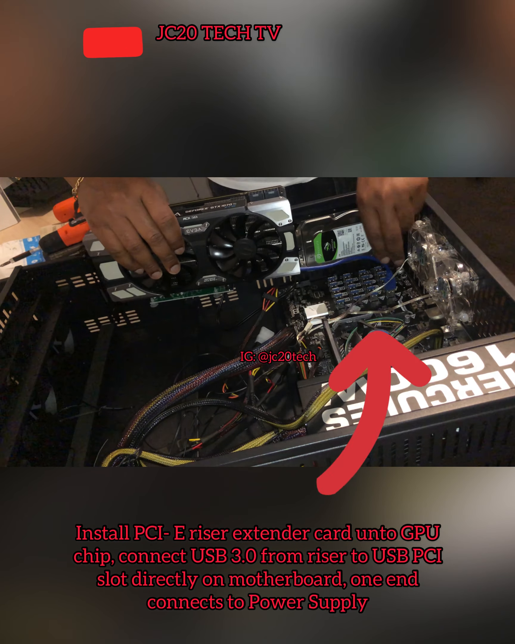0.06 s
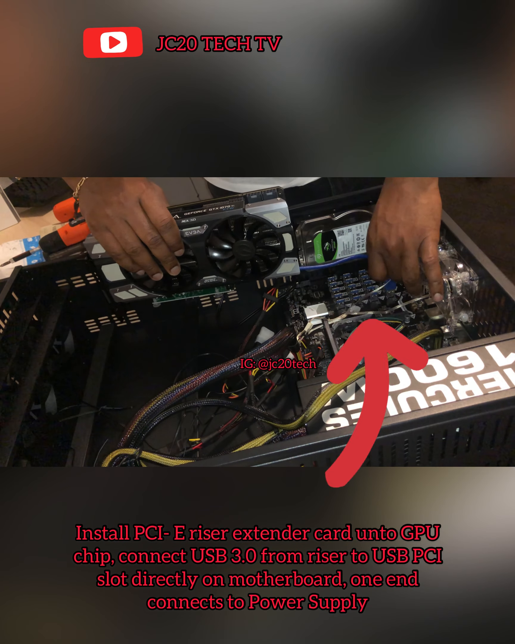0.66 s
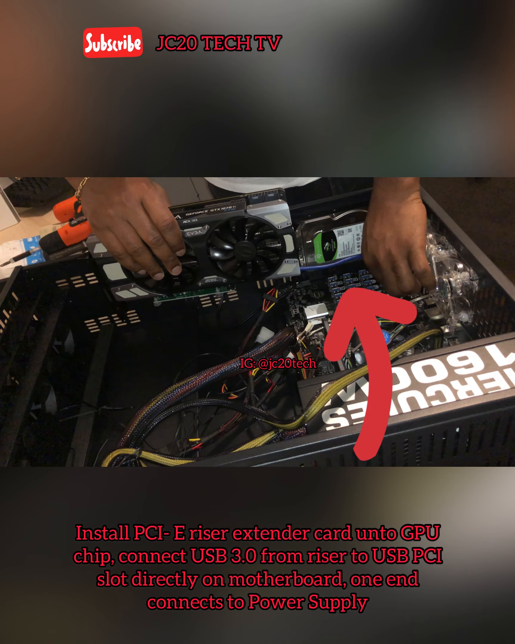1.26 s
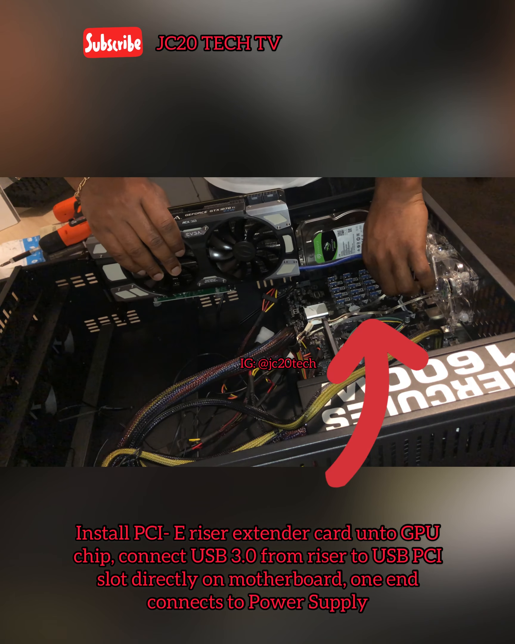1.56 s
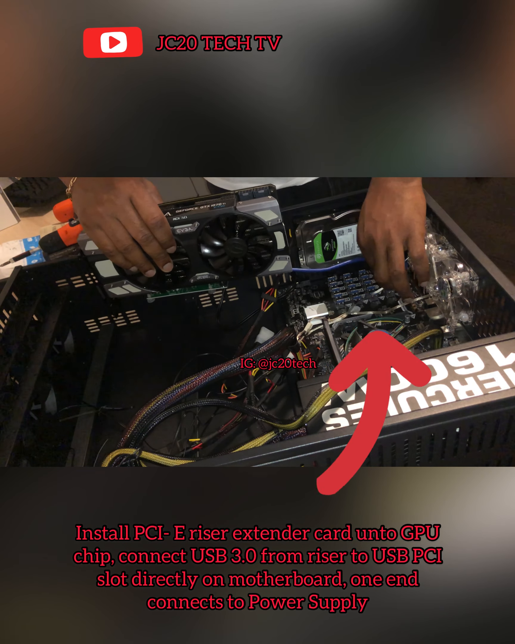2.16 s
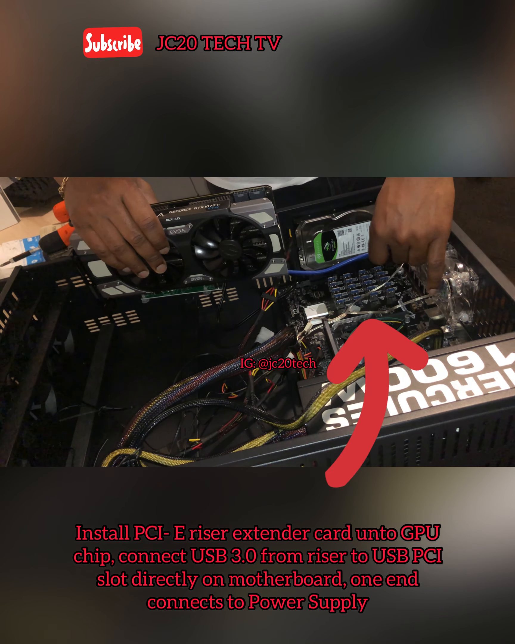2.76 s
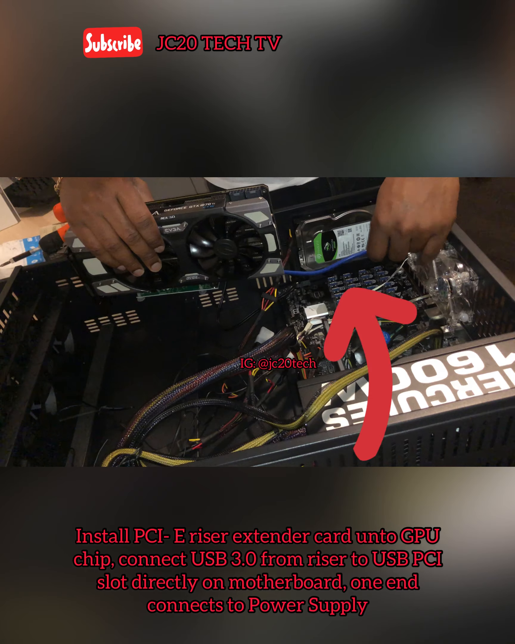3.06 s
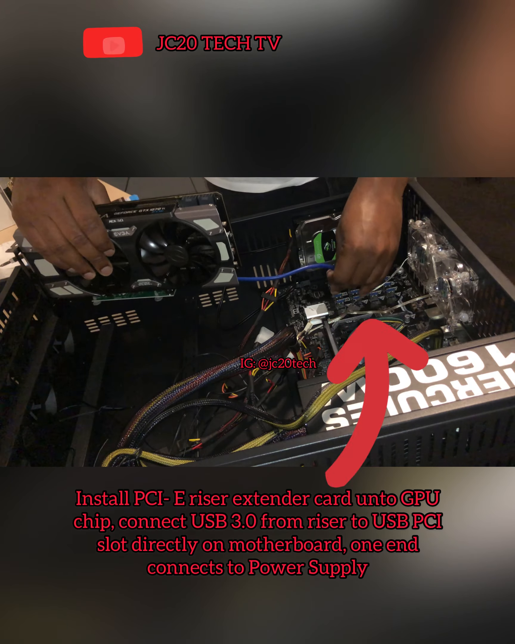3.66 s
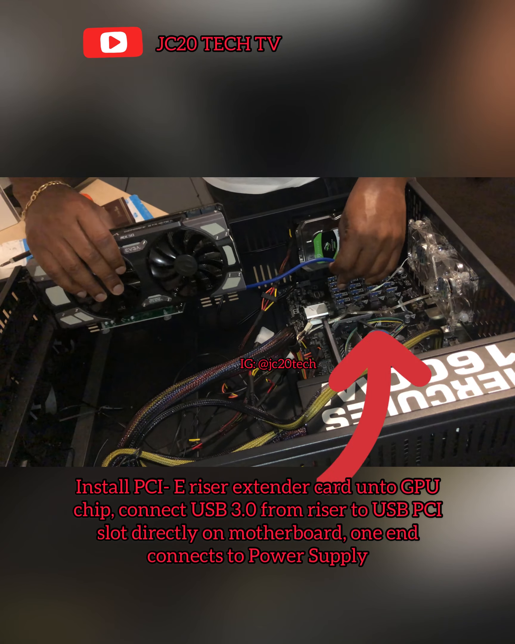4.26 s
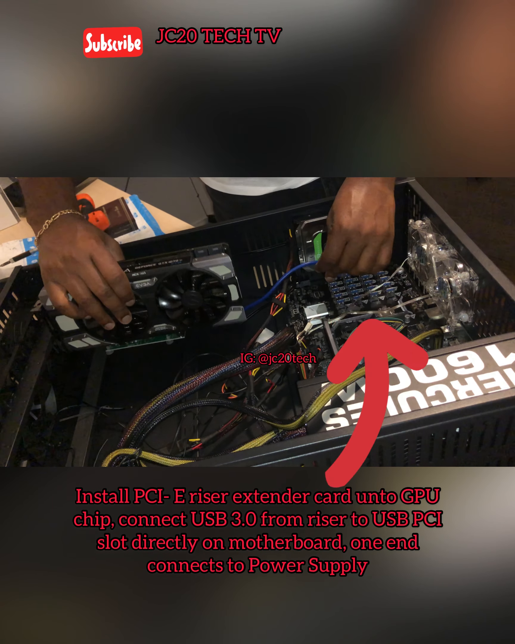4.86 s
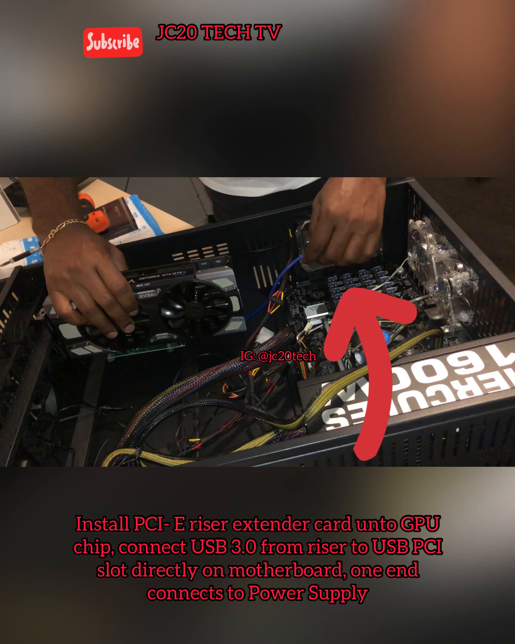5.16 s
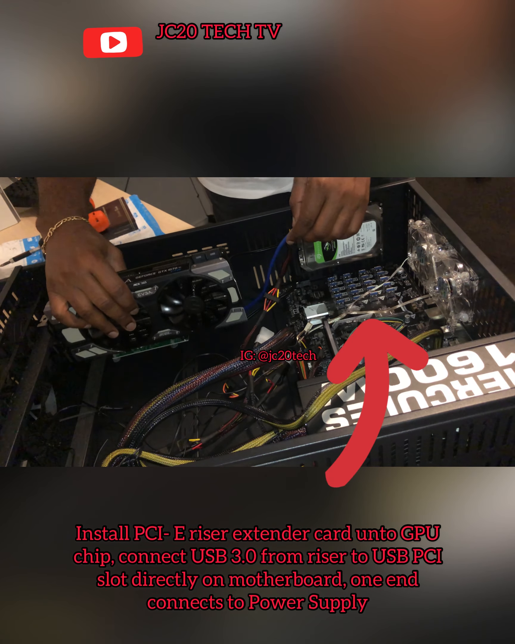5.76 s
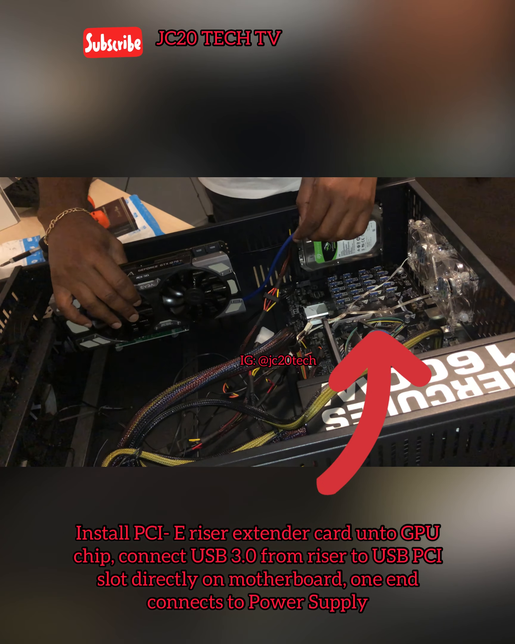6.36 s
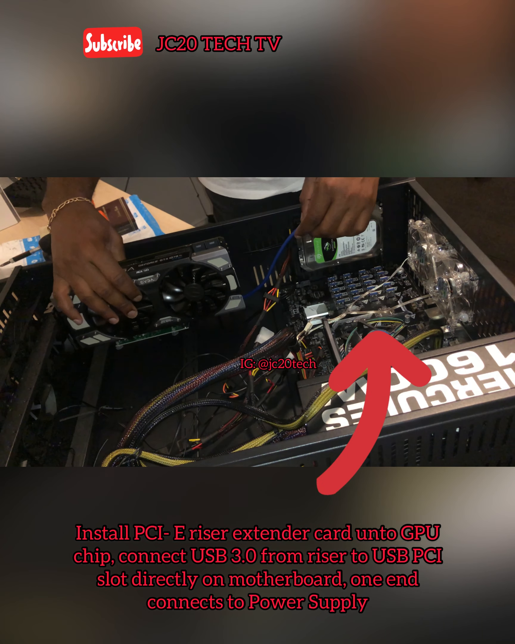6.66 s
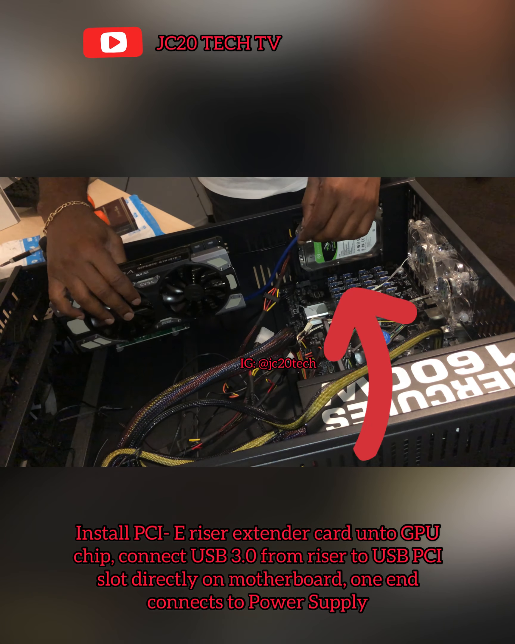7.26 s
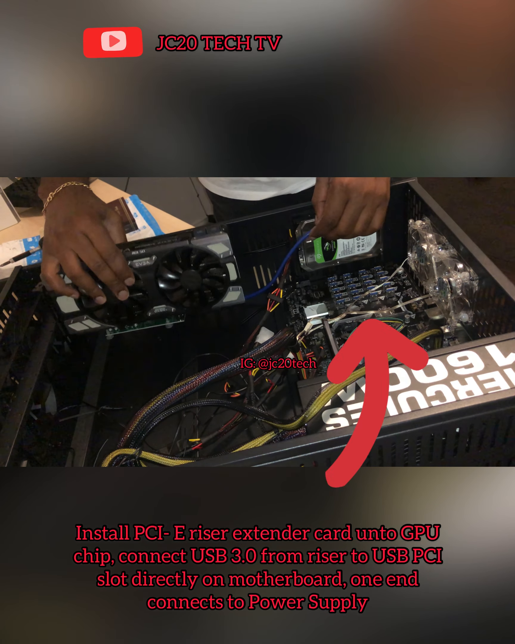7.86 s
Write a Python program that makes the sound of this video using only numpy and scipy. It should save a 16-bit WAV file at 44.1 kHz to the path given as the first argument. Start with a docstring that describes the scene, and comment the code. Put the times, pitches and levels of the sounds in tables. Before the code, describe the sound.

A loud snap, a latching plug, then a graphics card clanking into a steel computer case as cables tick and drag.

```python
"""Light knocks and plastic rustle come first, then the loud snap of a riser board onto a graphics card.
A plug latches with a double click, and the card is set down in an open steel case: its bracket clinks,
the panels boom, cables tick and drag along the frame, and plastic squeaks under a finger.
Heard close by on one microphone, in a small room that answers the contacts, over a faint fan hum."""
import sys
import numpy as np
from scipy import signal
from scipy.fft import rfft, irfft, next_fast_len
from scipy.io import wavfile
from scipy.ndimage import uniform_filter1d, map_coordinates

SR = 44100
rng = np.random.default_rng(int(sys.argv[2]) if len(sys.argv) > 2 else 0)


def store_pcm(level_fs):
    """Save levels as 16-bit WAV."""
    pcm = np.round(np.clip(level_fs, -1, 1) * 32767).astype(np.int16)
    wavfile.write(sys.argv[1], SR, np.atleast_2d(pcm).T)


N = 348390
AGE = np.arange(int(1.5 * SR)) / SR  # seconds since a contact

# contacts of the snap: t/s, level/dB, t60/s, jolt to the frame/dB
SNAP_CONTACTS = [(1.7202, -39, 0.032, -63.5), (1.7226, -30, .02, -64.5), (1.7244, -17, 0.019, -29.5),
                 (1.7264, -19.5, 0.021, -56), (1.7286, -23, 0.031, -54.5), (1.7544, -34, .035, -44.5)]
# spectrum of the slot: f/Hz, relative level/dB
SLOT_SPECTRUM = [(88, -42), (150, -8.5), (239, -12), (390, -14), (564, -5), (660, -10), (1520, -7.5),
                 (1650, -15.5), (1780, -11), (2040, -13.5), (3020, -13.5), (3260, -16.5), (3810, -13),
                 (9160, -19), (15800, -30)]
# modes of the board and of the loaded frame: f/Hz, relative level/dB, t60/s
BOARD_MODES = [(1063, -3.5, 0.081), (1170, -2.5, 0.087), (1350, -17, 0.21), (1550, -12.5, 0.19),
               (1730, 1.5, .075), (2233, -5.5, 0.033), (2344, -1.5, 0.056), (3830, -7, 0.048),
               (4960, -2, 0.033), (9050, -12, .025)]
FRAME_MODES = [(70.26, -13, 0.43), (163, -2.5, 0.33), (212.8, 4, 0.26), (263.7, 3.5, 0.26), (325, -6, 0.43),
               (478, -10.5, .4), (578, -6, 0.27), (785, -7.5, 0.27), (950, -9, .25)]

def riser(board_db=-5, thud_db=-2, boom_db=-8):
    """The card edge bottoms out in the slot and jolts the frame: the loudest sound at the microphone."""
    out = np.zeros(N)
    for s, db, t60, jolt_db in SNAP_CONTACTS:
        snap = colour(burst(t60), SLOT_SPECTRUM, peak_hz=1700, peak_db=2, tilt_db=0.2, octaves=0.6)
        add(out, s, amp(db) * in_room(snap, wet_db=-3.5))
        add(out, s, amp(jolt_db + boom_db) * boom())
    # the hardest blow sets the board and the frame ringing
    s, db, _, jolt_db = max(SNAP_CONTACTS, key=lambda row: row[1])
    add(out, s, amp(db + board_db) * in_room(ring(BOARD_MODES, rough=0.99), wet_db=-13.5))
    add(out, s, amp(jolt_db + thud_db) * ring(FRAME_MODES, attack=0.008))
    return out


# pushes into the socket: t/s, length/s, level/dB
PLUG_PUSHES = [(2.28, 0.093, -62.5), (2.39, .05, -54.5), (2.47, 0.089, -62.5)]
# clicks of the latch: t/s, level/dB, t60/s
LATCH_CLICKS = [(2.5424, -36.5, 0.025), (2.5445, -34.5, 0.035)]
# spectrum of the plug: f/Hz, relative level/dB
PLUG_SPECTRUM = [(120, -39), (200, -26), (236, -23), (316, -12.5), (621, -14), (693, -7.5), (999, -6.5),
                 (1220, -5.5), (1520, -8), (2190, -11), (2490, -15), (4160, -15), (4640, -18.5),
                 (5680, -15.5), (15800, -38.5)]
# modes of its shell: f/Hz, relative level/dB, t60/s
SHELL_MODES = [(679, -15, 0.33), (1196, -6, 0.22), (1321, -8, 0.22), (1400, -7, 0.28), (5520, -2.5, 0.03),
               (9200, -1.5, 0.029)]

def plug(shell_db=-7):
    """A plug scrapes into its socket and latches with a double click that rings its shell."""
    out = strokes(PLUG_PUSHES) * friction(PLUG_SPECTRUM, grain_db=1.9, grain_hz=150, tilt_db=-4.5)
    for s, db, t60 in LATCH_CLICKS:
        click = colour(burst(t60), PLUG_SPECTRUM, tilt_db=0.5)
        add(out, s, amp(db) * in_room(click, wet_db=-2))
        add(out, s, amp(db + shell_db) * in_room(ring(SHELL_MODES, rough=0.88), wet_db=-10.5))
    return out


# card against case: t/s, level/dB, resonance f/Hz, resonance/dB, tilt/(dB per octave), boom/dB
CARD_KNOCKS = [(.057, -53, 870, 8, 1.5, -78), (.868, -53, 1900, 5, -0.5, -80),
               (2.0063, -40, 4430, 5, 1, -55), (3.9737, -39.5, 3720, 7.5, 4, -57.5),
               (4.648, -38.5, 1840, 7, 1.5, -46.5), (4.6497, -39.5, 3650, 5, -0.5, -75),
               (4.672, -41, 1190, 14, -8, -51.5), (5.0155, -45.5, 1930, 13, 3.5, -85),
               (5.0628, -41.5, 6750, -3, 4.5, -51.5), (5.068, -39.5, 1530, 12.5, 0.5, -54),
               (5.091, -46.5, 833, 18, 2, -59), (5.418, -45.5, 3580, 3, 3, -50),
               (5.426, -49.5, 820, 10, -6, -59), (5.457, -44.5, 4250, 4, 5.5, -75),
               (5.74, -58, 2050, 10, 4, -72), (6.028, -50.5, 1500, 2, -3, -81),
               (6.207, -40, 5060, 7.5, 2.5, -56), (6.535, -58, 710, 11, -2, -57)]
# spectrum of the card: f/Hz, relative level/dB
CARD_SPECTRUM = [(150, -31), (250, -8.5), (443, -8), (1190, -4.5), (1350, -7.5), (1600, -6.5), (2650, -9.5),
                 (3490, -11.5), (4380, -13), (8030, -21), (15800, -44)]

def knocks(t60_at_1khz=0.062, damping=0.56):
    """Each knock cracks at its own resonance, the higher the shorter; the steel booms a moment later."""
    out = np.zeros(N)
    for s, db, hz, peak_db, tilt_db, boom_db in CARD_KNOCKS:
        t60 = t60_at_1khz / (hz / 1000) ** damping
        crack = colour(burst(t60), CARD_SPECTRUM, hz, peak_db, tilt_db)
        add(out, s, amp(db) * in_room(crack, wet_db=-2))
        add(out, s, amp(boom_db) * boom())
    return out


# spectrum of the case panels: f/Hz, relative level/dB
BOOM_SPECTRUM = [(30, -27), (55, -30), (70, -0.5), (100, -1.5), (160, 3), (220, 2), (320, -5), (500, -7),
                 (900, -28), (2500, -62)]

def boom(t60=0.44, swell_s=0.012):
    """The sheet steel of the case starts slowly and drums on."""
    shake = burst(t60, attack=swell_s)
    onset = 1 - np.exp(-2 * AGE[:len(shake)] / swell_s)
    return colour(shake * onset, BOOM_SPECTRUM)


# metal meeting metal in the case: t/s, bracket/dB, tab/dB, cooler/dB, rail/dB, floor panel/dB
METAL_CONTACTS = [(3.975, -52, -81, -76, -59, -60), (4.649, -61, -68, -45.5, -61.5, -39),
                  (5.016, -63.5, -55.5, -69, -73.5, -75), (5.458, -64.5, -52, -72, -73, -72)]
# modes of those five parts: f/Hz, relative level/dB, t60/s
BRACKET_MODES = [(1444, -11, 0.36), (1600, -12, 0.47), (2170, -5, 0.52), (2390, -2.5, 0.27),
                 (3420, -18, 0.48), (3690, 3.5, 0.12), (3795, 1, 0.1), (4420, -11, 0.19),
                 (5100, -2.5, 0.063), (5450, -12.5, 1), (5890, -3, 0.12), (6110, -10, 0.36),
                 (6460, -5, .28), (7270, -9, 0.48), (7530, -11, .33), (9100, -6.5, .18), (11530, -12, .2),
                 (12100, -15, .2)]
TAB_MODES = [(2050, -8, .4), (3520, -5, 0.059), (3780, -10, .2), (4570, -15, 0.26), (4900, -12, .25),
             (5000, -14, 0.32), (6620, -9, 0.16), (7574, -11, .35), (8260, 0, 0.19), (8450, -11, 0.082),
             (15200, -18, .07)]
COOLER_MODES = [(580, -13, .6), (1133, -8, 0.34), (1206, -6, .4), (1643, -2, 0.097), (1752, -4, 0.17),
                (1850, -5.5, 0.17), (2026, -8, .3), (2430, -11.5, 0.32), (2760, -11, .35), (3370, -18, .2),
                (3646, -0.5, 0.063), (5460, -16.5, 1.3)]
RAIL_MODES = [(290, 0, 2.07), (598, -5, 0.76), (727, 2, 1.8), (2180, -6.5, 1.0)]
PANEL_MODES = [(68.7, -9, 0.51), (103, -1.5, 0.44), (146, 1.5, 1), (217, -16, 0.65)]

def clinks(strike_db=8, strike_t60=0.032):
    """Bracket, tab and cooler flare, are damped by the hand and ring on; rail and panel swell slowly."""
    out = np.zeros(N)
    flare = 1 + amp(strike_db) * fade(strike_t60)
    for s, bracket_db, tab_db, cooler_db, rail_db, panel_db in METAL_CONTACTS:
        bracket = amp(bracket_db) * ring(BRACKET_MODES, rough=1.35)
        tab = amp(tab_db) * ring(TAB_MODES, rough=1.9)
        cooler = amp(cooler_db) * ring(COOLER_MODES, rough=0.94)
        add(out, s, in_room(flare * (bracket + tab + cooler), wet_db=-10))
        add(out, s, amp(rail_db) * ring(RAIL_MODES, attack=0.022))
        add(out, s, amp(panel_db) * ring(PANEL_MODES, attack=0.041))
    return out


# cables and fingers sliding: t/s, length/s, level/dB
SLIDE_STROKES = [(.35, .13, -68.5), (0.637, 0.23, -68), (0.982, .06, -69.5), (1.438, 0.037, -69),
                 (1.916, 0.086, -60.5), (2.275, 0.065, -64.5), (2.368, .05, -67), (2.95, 0.064, -72.5),
                 (4.848, 0.26, -71.5), (6.138, 0.11, -73), (6.404, 0.26, -69.5), (6.989, 0.057, -69.5),
                 (7.232, .09, -73), (7.46, 0.037, -77)]
# a cable dragging on the case: t/s, length/s, level/dB before drag_db
CABLE_DRAGS = [(6.8, .58, -57.5)]
# the cable slipping: t/s, level/dB, resonance f/Hz
CABLE_SLIPS = [(6.772, -51.5, 245), (6.812, -50, 246), (6.864, -48, 413), (6.878, -45, 238),
               (6.9, -55, 450), (7.02, -57, 440), (7.112, -51.5, 350), (7.162, -45, 433), (7.27, -51, 427),
               (7.284, -48, 433), (7.381, -54, 400)]
# spectra of the sliding hiss and of the hollow case: f/Hz, relative level/dB
HISS_SPECTRUM = [(400, -33), (1500, -1), (2800, -5.5), (4200, -2.5), (6000, -3), (9000, -9.5), (15000, -22)]
HOLLOW_SPECTRUM = [(90, -28), (170, -10.5), (240, 0), (290, -4), (370, -6), (435, 2), (520, -8),
                   (650, -9.5), (900, -18.5), (2500, -42)]

def cables(drag_db=-5):
    """Sliding gives a grainy hiss; stick and slip drum on the hollow case."""
    hiss = strokes(SLIDE_STROKES) * friction(HISS_SPECTRUM, grain_db=2.5, grain_hz=400)
    drum = amp(drag_db) * strokes(CABLE_DRAGS) * friction(HOLLOW_SPECTRUM, grain_db=1.9, grain_hz=45)
    for s, db, hz in CABLE_SLIPS:
        slip = colour(burst(t60=0.078, attack=0.0012), HOLLOW_SPECTRUM, hz, peak_db=10.5)
        add(drum, s, amp(db) * slip)
    return hiss + drum


# small plastic taps: t/s, level/dB, resonance f/Hz, resonance/dB
PLASTIC_TAPS = [(0.72, -49, 4600, 11), (0.98, -50, 4800, 4), (1.9912, -45.5, 4050, 7.5),
                (2.197, -50, 3930, 16), (4.5093, -59.5, 7500, 0), (4.941, -55, 6000, 17),
                (5.2486, -52, 7600, 16), (5.6445, -53, 7600, 16), (6.7703, -41.5, 3230, 11.5),
                (6.852, -53.5, 3400, -9), (7.0587, -46, 5600, 20), (7.061, -46, 9400, 20),
                (7.376, -45.5, 7800, 17)]

def ticks(strays_per_s=9, stray_over_hiss_db=9, stray_hz=5000):
    """Connectors and cable sheaths tap the parts, and tick faintly at random while they slide."""
    out = np.zeros(N)
    for s, db, hz, peak_db in PLASTIC_TAPS:
        add(out, s, amp(db) * tick(hz, peak_db))
    for start, length, db in SLIDE_STROKES:
        for when, pitch in rng.random((round(strays_per_s * length), 2)):
            hz = stray_hz * 2 ** (pitch - 0.5)  # within half an octave either way
            add(out, start + when * length, amp(db + stray_over_hiss_db) * tick(hz, peak_db=7))
    return out


# spectrum of the plastic parts: f/Hz, relative level/dB
PLASTIC_SPECTRUM = [(300, -24.5), (1200, 1.5), (4000, 4), (9000, 0), (15500, -14)]

def tick(hz, peak_db):
    """One light tap of plastic, heard with the room."""
    tap = colour(burst(t60=0.017), PLASTIC_SPECTRUM, hz, peak_db, octaves=0.26)
    return in_room(tap, wet_db=-6)


# plastic squeaking under a finger: t/s, level/dB, f/Hz
FINGER_SQUEAKS = [(0.689, -61, 4300), (1.468, -60, 4350), (2.8385, -61.5, 5260), (3.885, -63, 4970),
                  (6.125, -67, 4700), (6.185, -63, 4750)]

def squeaks():
    """A fingertip catches on plastic and excites one narrow resonance."""
    out = np.zeros(N)
    for s, db, hz in FINGER_SQUEAKS:
        catch = burst(t60=0.077, attack=0.003)
        squeak = colour(catch, PLASTIC_SPECTRUM, hz, peak_db=17.5, octaves=0.053)
        add(out, s, amp(db) * in_room(squeak, wet_db=-6))
    return out


# spectrum of the moving air: f/Hz, relative level/dB
AIR_SPECTRUM = [(15, -76), (25, -55), (59, -12.5), (116, -16), (148, -2), (194, -8.5), (222, -11.5),
                (324, -9.5), (352, -12.5), (572, -13), (729, -12.5), (981, -17), (2520, -23.5),
                (3050, -24.5), (15800, -33.5)]
# motor tones: f/Hz, level/dB before hum_db
MOTOR_TONES = [(75.4, -77), (150.7, -75), (220.7, -80.5), (355.3, -80), (705.2, -74.5), (753.7, -83),
               (888.2, -83)]

def fan(air_db=-66, hum_db=-1, waver_rad=0.26):
    """The room tone behind the work: a fan's steady air noise and slightly unsteady motor hum."""
    t = np.arange(N) / SR
    hum = np.zeros(N)
    for hz, db in MOTOR_TONES:
        peak = np.sqrt(2) * amp(db + hum_db + 0.98 * wobble(4.08))
        hum += peak * np.sin(2 * np.pi * hz * t + waver_rad * wobble(7.8))
    air = unit(colour(rng.standard_normal(N), AIR_SPECTRUM))
    return amp(air_db) * air + hum


# reverberation of the small room: f/Hz, t60/s
ROOM_DECAY = [(100, 0.18), (500, 0.6), (1500, 0.52), (4000, 0.45), (9000, .42), (16000, 0.2)]

def in_room(x, wet_db, build_s=0.0014):
    """A sound reaches the microphone directly, followed by the room's diffuse answer from that spot."""
    hz, t, noise = signal.stft(rng.standard_normal(SR * 2 // 3), SR, nperseg=256)
    envelope = fade(along(ROOM_DECAY, hz)[:, None], t) * (1 - np.exp(-t / build_s))
    response = signal.istft(noise * envelope, SR, nperseg=256)[1]
    response *= amp(wet_db) / np.linalg.norm(response)
    response[0] += 1  # the direct path
    return signal.fftconvolve(x, response)


def burst(t60, attack=0.00019, span_hz=350):
    """The dense, quickly dying vibration of one contact, its energy spread evenly over frequency."""
    t = AGE[:SR * 3 // 4]
    spectrum = rfft(rng.standard_normal(len(t)) * fade(t60, t) * (1 - np.exp(-t / attack)))
    power = np.abs(uniform_filter1d(np.abs(spectrum) ** 2, int(span_hz * t[-1]) + 1))
    even = irfft(spectrum * np.sqrt(power.mean() / (power + 1e-12)), len(t))
    taper = np.clip(2 - 4 * t / t[-1], 0, 1)
    return even * taper


def ring(modes, attack=0.00029, scatter_db=2.5, rough=0):
    """Modes struck at slightly random strengths; loose contact roughens their phase."""
    drifts = np.cumsum(rng.standard_normal((len(modes), len(AGE))), axis=1) * rough / np.sqrt(SR)
    out = np.zeros(len(AGE))
    for (hz, db, t60), drift in zip(modes, drifts):
        strength = amp(db + scatter_db * rng.normal())
        out += strength * fade(t60) * np.sin(2 * np.pi * (hz * AGE + rng.random() + drift))
    return out * (1 - np.exp(-AGE / attack))


def friction(spectrum, grain_db, grain_hz, tilt_db=0):
    """Rubbing noise of rms 1, made grainy by a flickering level."""
    grains = rng.standard_normal(N) * amp(grain_db * wobble(grain_hz))
    return unit(colour(grains, spectrum, tilt_db=tilt_db))


def strokes(rows, attack_s=0.032, release_t60=0.45):
    """Gain per sample of rubbing strokes: each gathers speed, holds, then dies away."""
    t = np.arange(N) / SR
    gain = np.zeros(N)
    for s, length, db in rows:
        rise = np.clip((t - s) / attack_s, 0, 1)
        gain += amp(db) * rise * fade(release_t60, np.maximum(t - s - length, 0))
    return gain


def colour(x, spectrum, peak_hz=1000, peak_db=0, tilt_db=0, octaves=0.15):
    """Causal filter of unit power: a spectrum, one resonance and a tilt per octave."""
    size = next_fast_len(len(x) + 4096, True) // 2 * 2
    hz = np.fft.rfftfreq(size, 1 / SR)
    octaves_away = np.log2((hz + 20) / peak_hz)
    resonance_db = peak_db * np.exp(-0.5 * (octaves_away / octaves) ** 2)
    gain = unit(amp(along(spectrum, hz) + resonance_db + tilt_db * octaves_away))
    # minimum phase: nothing sounds ahead of the contact
    cepstrum = irfft(np.log(gain + 1e-6))
    cepstrum[1:size // 2] *= 2
    cepstrum[size // 2 + 1:] = 0
    return irfft(rfft(x, size) * np.exp(rfft(cepstrum)))[:len(x)]


def amp(db):
    """Decibels to gain."""
    return 10 ** (np.asarray(db) / 20)


def unit(x):
    """Scale to rms 1."""
    return x / np.sqrt(np.mean(x ** 2) + 1e-20)


def along(points, hz):
    """Interpolate (f/Hz, value) points on a log axis."""
    f, values = np.transpose(points)
    return np.interp(np.log(hz + 1), np.log(f + 1), values)


def wobble(rate):
    """A smooth random curve, rate knots a second."""
    knots = rng.standard_normal(int(N * rate / SR) + 4)
    return map_coordinates(knots, [np.arange(N) * rate / SR])


def fade(t60, t=AGE):
    """Exponential decay by 60 dB in t60 seconds."""
    return np.exp(-np.log(1000) * t / np.maximum(t60, 1e-3))


def add(track, s, sound):
    """Mix a sound in at s seconds."""
    part = track[round(s * SR):][:len(sound)]
    part += sound[:len(part)]


def scene():
    """All sources at one microphone near the open case."""
    return (fan() + riser() + plug() + knocks() + clinks() + cables() + squeaks() + ticks())[None]


def record(dry, low_hz=52, top_hz=15850):
    """The microphone drops the deep bass; nothing passes above top_hz."""
    thin = signal.sosfilt(signal.butter(4, low_hz, 'high', fs=SR, output='sos'), dry)
    size = next_fast_len(N + SR // 2)
    passband = np.fft.rfftfreq(size, 1 / SR) < top_hz
    return irfft(rfft(thin, size) * passband, size)[:, :N]


dry = scene()
out = record(dry)
store_pcm(out)
```